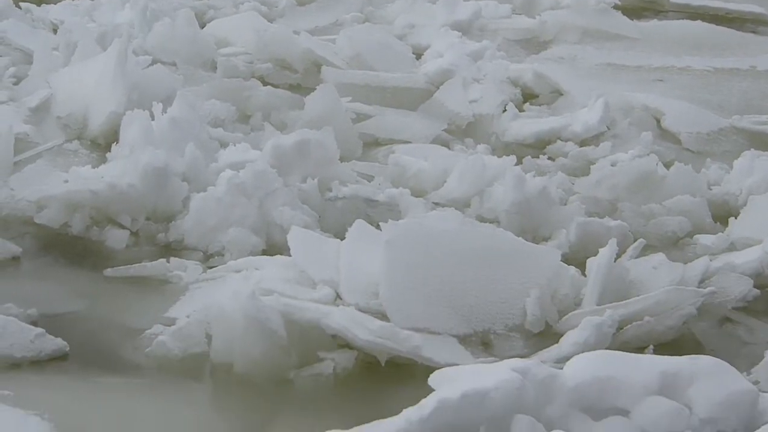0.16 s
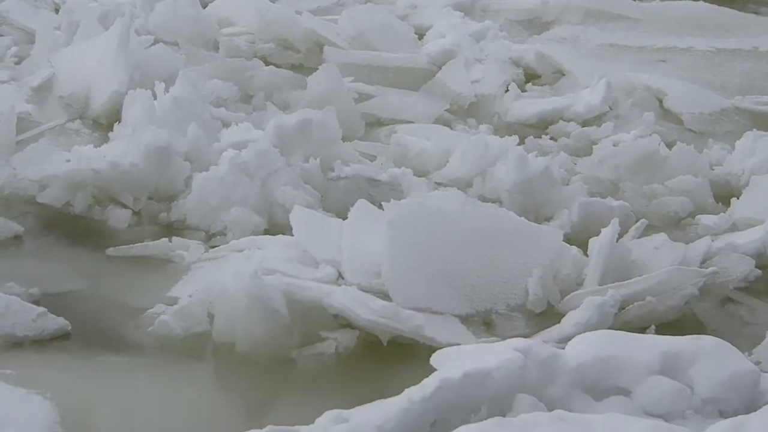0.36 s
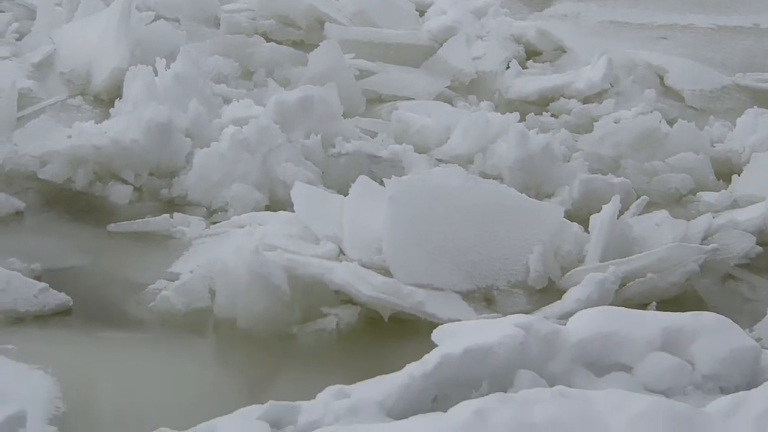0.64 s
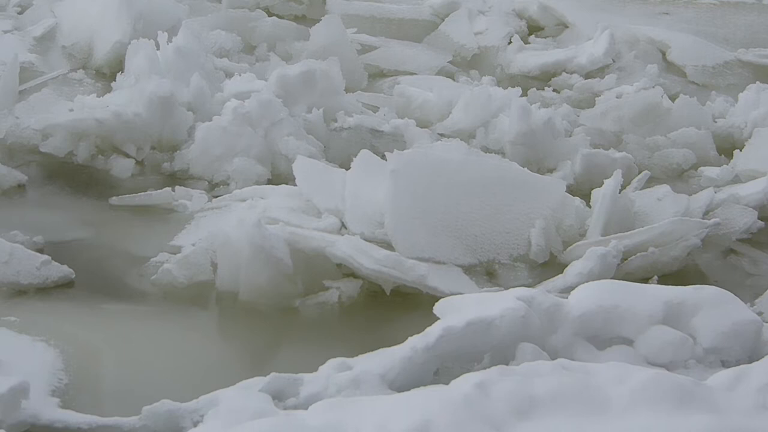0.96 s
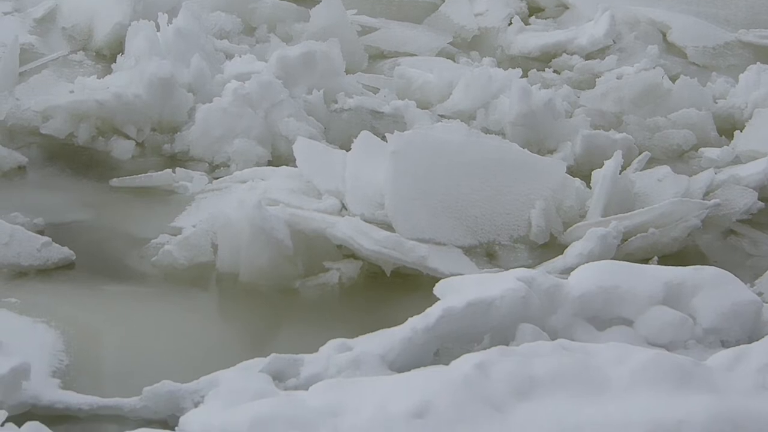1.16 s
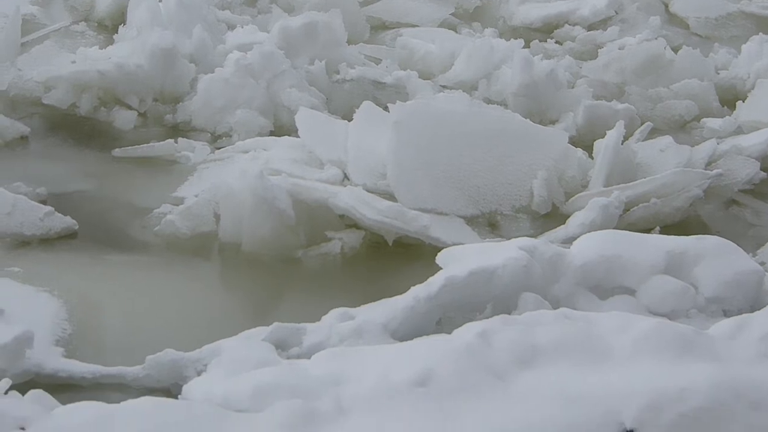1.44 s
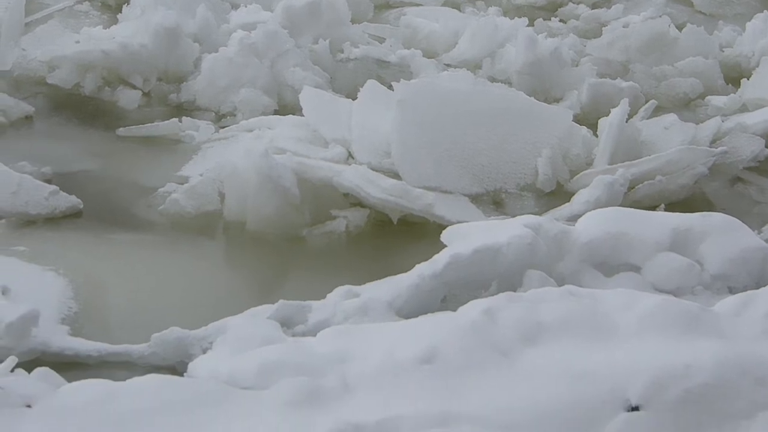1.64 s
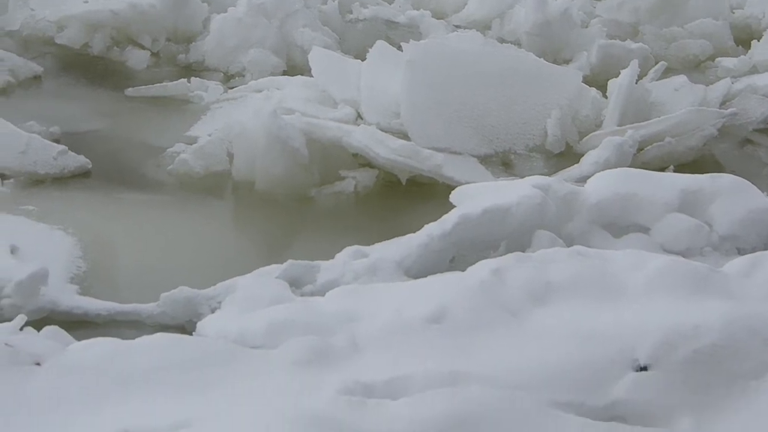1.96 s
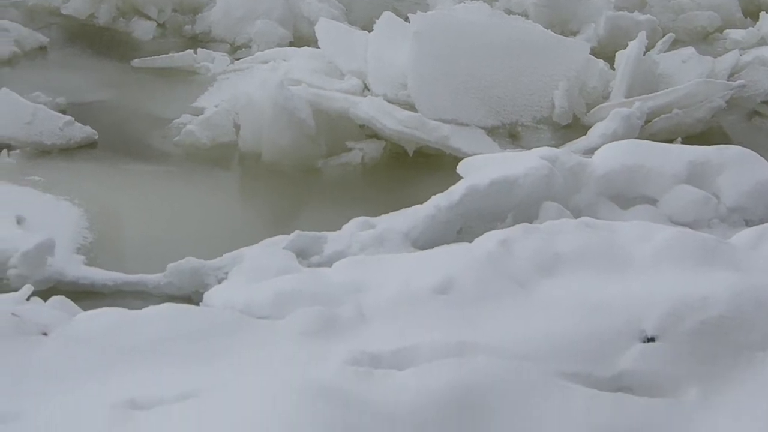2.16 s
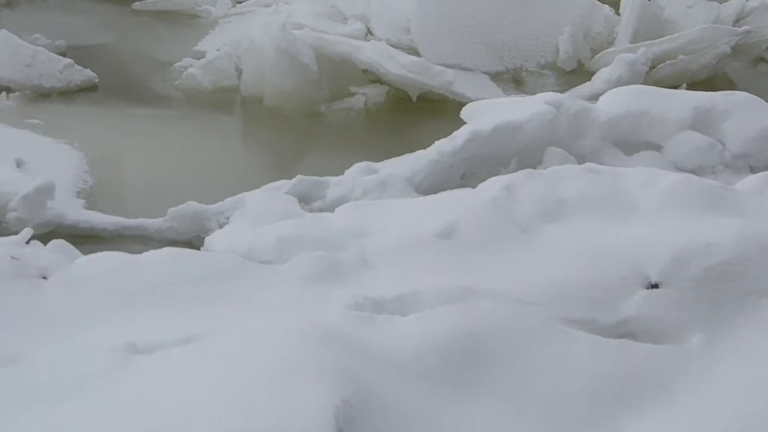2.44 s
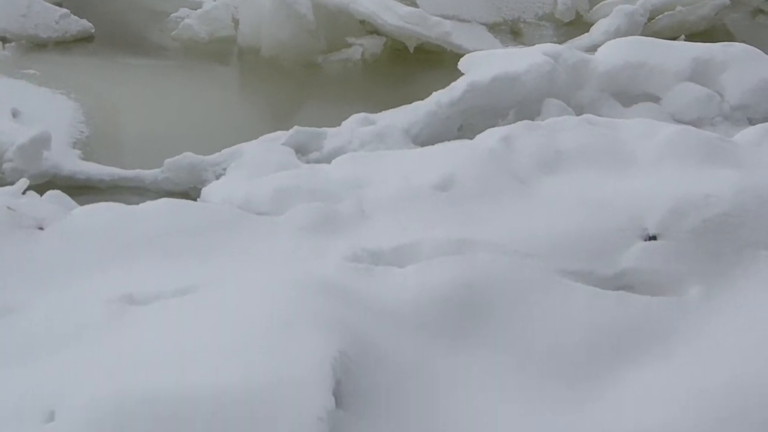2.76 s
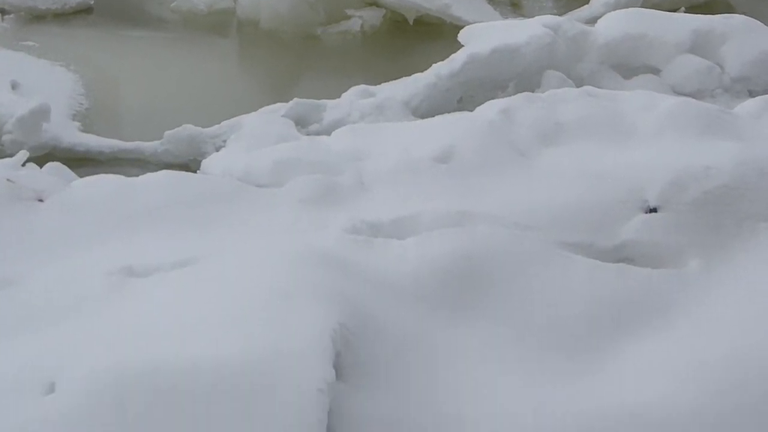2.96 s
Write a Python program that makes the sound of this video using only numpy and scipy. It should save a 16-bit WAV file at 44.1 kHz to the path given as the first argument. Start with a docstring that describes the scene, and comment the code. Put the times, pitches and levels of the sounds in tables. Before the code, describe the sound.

Gusty wind rumbles and flutters on a microphone over a very faint slush hiss

```python
"""Gusty wind on an icy riverbank

Gusty wind buffets a camera's microphone on the bank of an ice-choked river.
Eddies push on one port and pull on the other: filtered noise makes a low, lumpy rumble,
with a brighter flutter and crackle. Single big eddies add thuds, slaps and spits.
Behind the wind, drifting slush hisses faintly (noise and tiny grains),
and the ice ticks now and then (short noise crunches with a brief ring)."""
import sys
import numpy as np
from scipy import signal
from scipy.fft import rfft, irfft
from scipy.io import wavfile
from scipy.ndimage import uniform_filter1d

SR = 44100
rng = np.random.default_rng(int(sys.argv[2]) if len(sys.argv) > 2 else 0)


def transcribe(signal):
    """Save signal, clipped to [-1, 1], as a 16-bit WAV file at the path in sys.argv[1]."""
    frames = np.atleast_2d(signal).T
    limited = np.clip(frames, -1, 1)
    pcm = np.round(limited * 32767).astype(np.int16)
    wavfile.write(sys.argv[1], SR, pcm)


N = 137151  # length in samples
T, HZ = np.arange(N) / SR, np.fft.rfftfreq(N, 1 / SR)  # time of each sample, pitch of each frequency bin

# Slush hiss, tone colour: (frequency [Hz], relative level [dB])
SLUSH_SPECTRUM = [(20, 2), (60, 8.5), (300, 5.5), (1000, 6.5), (2500, -3.5), (3400, -5), (4040, 0),
                  (4350, -2), (4870, 3), (5700, 0.5), (7400, 1), (10700, -10.5), (15000, -29.5)]
# Stereo width of the slush: (frequency [Hz], side against centre [dB])
SLUSH_WIDTH = [(50, -68), (1000, -25), (3300, -8), (5000, -7.5), (7000, -7), (9000, -4), (14000, -2)]
# Slush loudness, before its flicker: (time [s], level [dB])
SLUSH_LEVEL = [(0, -63), (.2, -63), (.4, -60.5), (.55, -63), (1.0, -63.5), (1.35, -64.5), (1.62, -61.5),
               (1.8, -63.5), (2.3, -63.5), (2.9, -60), (3.11, -64.5)]
GRAINS_PER_S, GRAIN_SPREAD_DB = 1300, 2.5
GRAINS_DB = -10  # grains against the smooth hiss, before colouring
SLUSH_FLICKER_DB, SLUSH_FLICKER_HZ = 1, 19

# Ice ticks: (time [s], level before the top is softened [dB], ring frequency [Hz], decay [s],
# ring against crack [dB], upper edge [Hz])
TICKS = [(2.392, -50, 5100, 0.0048, -2.5, 7000), (2.684, -55, 2890, .005, -8, 3300),
         (3.046, -49.5, 7200, .0035, -18, 14500)]
# Tone colour of the crack: (frequency [Hz], relative level [dB])
CRACK_SPECTRUM = [(300, -5), (2000, 11), (3600, -3), (4400, 0), (8000, -3.5), (15000, -13)]
TICK_RING_WIDTH_HZ = 320  # from the middle of the ring to half strength

# Wind gusts, before the trims below: (time [s], rumble level [dB], flutter level [dB])
GUSTS = [(0.0, -26.5, -50), (0.035, -23.5, -47.5), (0.1, -28.5, -48), (0.135, -33, -62),
         (0.175, -23.5, -51), (0.22, -29.5, -54.5), (0.3, -29.5, -55.5), (0.39, -27, -53.5),
         (0.48, -24, -52.5), (0.54, -29, -52), (0.6, -30, -48), (0.68, -24, -51.5), (0.74, -28, -51),
         (0.815, -26.5, -45), (0.885, -27.5, -52), (0.93, -23.5, -45), (0.985, -22.5, -44.5),
         (1.035, -27, -49.5), (1.072, -25, -46.5), (1.12, -30, -56.5), (1.165, -29.5, -63),
         (1.195, -26.5, -53), (1.22, -33, -58), (1.265, -24.5, -40.5), (1.285, -29.5, -50),
         (1.305, -27, -54), (1.335, -25, -48), (1.37, -30.5, -48.5), (1.4, -30, -53.5),
         (1.541, -42.5, -64.5), (1.596, -29.5, -56.5), (1.65, -34, -53.5), (1.69, -23, -59),
         (1.75, -27.5, -46), (1.805, -24.5, -42), (1.835, -28.5, -47), (1.875, -28.5, -50),
         (1.92, -24.5, -51), (1.97, -28, -50), (2.015, -25.5, -46), (2.11, -26, -49.5), (2.16, -27.5, -49),
         (2.24, -26, -49), (2.29, -34.5, -55), (2.361, -24, -46.5), (2.41, -27, -49.5),
         (2.485, -33.5, -57.5), (2.564, -23, -46.5), (2.64, -29, -50), (2.71, -31.5, -53),
         (2.76, -40.5, -63.5), (2.8, -33.5, -59.5), (2.84, -34, -58), (2.9, -27, -53), (2.952, -23, -46.5),
         (3.02, -27, -51), (3.11, -28, -51)]
# Strongest single eddies, before the trims below: (time of the middle [s], thud peak [dB],
# slap peak [dB], spit peak [dB], break-up time [s])
BUFFETS = [(0.039, -12, -19, -46, .003), (0.108, -20, -25, -46, .002), (0.475, -17, -23, -47, .002),
           (0.504, -13, -14, -41, .004), (0.59, -17, -24, -42, .004), (0.607, -18, -22, -39, .002),
           (0.638, -18, -25, -50, .002), (0.684, -23, -29, -39, .003), (0.772, -19, -30, -43, .003),
           (0.858, -21, -22, -43, .002), (0.988, -11, -19, -39, .004), (1.008, -15, -22, -34, .002),
           (1.02, -16, -21, -45, .002), (1.26, -21, -21, -37, .005), (1.273, -16, -22, -49, .002),
           (1.331, -15, -32, -51, .002), (1.372, -25, -20, -43, .005), (1.679, -18, -23, -45, .002),
           (1.718, -14, -32, -58, .002), (1.799, -17, -31, -38, .003), (1.811, -18, -16, -31, .003),
           (1.853, -11, -20, -41, .003), (1.906, -19, -24, -50, .002), (1.981, -26, -30, -33, .003),
           (2.031, -14, -27, -50, .002), (2.077, -19, -32, -39, .003), (2.191, -18, -24, -39, .002),
           (2.241, -16, -22, -37, .003), (2.371, -17, -24, -45, .002), (2.573, -16, -23, -46, .004),
           (2.624, -22, -22, -42, .002), (2.886, -13, -24, -56, .002), (2.949, -20, -21, -39, .003),
           (2.983, -23, -20, -47, .003), (3.047, -17, -21, -39, .002)]
# Tone colours of the wind and its eddies, each: (frequency [Hz], relative level [dB])
RUMBLE_SPECTRUM = [(20, -50), (45, -44), (75, -18.5), (120, -4.5), (185, 0.5), (300, 0), (450, -5),
                   (700, -13), (1100, -30), (2000, -76), (4000, -100)]
FLUTTER_SPECTRUM = [(100, -43), (250, -17), (450, 1), (700, -4.5), (1000, -8), (1500, -17.5), (2000, -27),
                    (2700, -35.5), (3500, -49), (7000, -88)]
THUD_SPECTRUM = [(20, -31), (50, -32), (120, -5.5), (230, 9), (420, 0.5), (750, -46), (1600, -35),
                 (2700, -67), (4000, -87), (8000, -110)]
SLAP_SPECTRUM = [(100, -30), (250, -7), (450, 0), (600, -2), (800, -9), (1100, -18), (1500, -30),
                 (2500, -56), (5000, -95)]
SPIT_SPECTRUM = [(300, -30), (900, -3), (1400, 0), (1900, -4), (2600, -14), (3500, -29), (7000, -72),
                 (14000, -100)]
# Share of the wind both ports feel alike: (frequency [Hz], level against the push-pull part [dB])
COMMON_SHARE = [(30, -4.5), (70, -12), (150, -16), (300, -21), (600, -18.5), (1200, -11.5), (2200, -9.5),
                (4000, -5)]
RUMBLE_TRIM_DB, FLUTTER_TRIM_DB = -0.5, 9
THUD_TRIM_DB, SLAP_TRIM_DB, SPIT_TRIM_DB = -0.5, 0.5, 2
RUMBLE_LUMP_DB, FLUTTER_LUMP_DB, LUMP_HZ = 4.2, 6, 55
LUMP_SHARED = 0.8  # how far the flutter's lumps follow the rumble's (0 to 1)
CRACKLE_PER_S, CRACKLE_DB, CRACKLE_SPREAD_DB, CRACKLE_S = 85, -8.5, 6, 0.0018
WIND_TILT_DB = 0.1626  # the right port is raised and the left lowered by this much

OFFSET, EDGE_HZ = -0.0035, 15600  # the recorder's constant offset and upper band edge


def amp(db):
    """Turns decibels into a gain."""
    return 10 ** (np.asarray(db) / 20)


def unit(x):
    """Scales a sound to an average strength (rms) of 1."""
    return x / np.sqrt(np.mean(x ** 2) + 1e-20)


def colour(x, points):
    """Filters a sound by a table of (frequency [Hz], level [dB])."""
    hz, db = np.transpose(points)
    bins = np.fft.rfftfreq(len(x), 1 / SR)
    gain = amp(np.interp(np.log(bins + 1), np.log(hz), db))
    return irfft(rfft(x) * gain, len(x))


def noise(points):
    """Makes noise of rms 1 with the given tone colour."""
    return unit(colour(rng.standard_normal(N), points))


def unsteadiness(rate_hz, slowest_hz=9):
    """Random ups and downs mostly between two rates, gently limited to stay within -2 and 2."""
    shape = HZ / np.hypot(HZ, slowest_hz) / np.sqrt(1 + (HZ / rate_hz) ** 4)
    wander = unit(irfft(rfft(rng.standard_normal(N)) * shape, N))
    return 2 * np.tanh(wander / 2)


def steady(x, size=1800):
    """Evens out the slow changes in level and keeps the quick lumps."""
    power = uniform_filter1d(uniform_filter1d(x ** 2, size), size)
    return x / np.sqrt(power + 1e-12)


def fizz():
    """Smooth far hiss plus nearer grains: random clicks of either sign and uneven size."""
    happens = rng.random(N) < GRAINS_PER_S / SR
    sign = rng.choice([-1, 1], N)
    size = amp(GRAIN_SPREAD_DB * np.minimum(rng.exponential(1, N), 5))
    grains = unit(happens * sign * size)
    return unit(colour(rng.standard_normal(N) + amp(GRAINS_DB) * grains, SLUSH_SPECTRUM))


def slush():
    """Countless tiny ice crystals rub in the current: a fine, slightly grainy hiss."""
    centre, side = fizz(), colour(fizz(), SLUSH_WIDTH)
    flicker_db = SLUSH_FLICKER_DB * unsteadiness(SLUSH_FLICKER_HZ)
    level_db = np.interp(T, *np.transpose(SLUSH_LEVEL)) + flicker_db
    return np.array([centre + side, centre - side]) * amp(level_db)


def ticks(side_db=-8):
    """Ice cracks: a short crunch of noise with a brief ring, both dying away together."""
    out = np.zeros((2, N))
    for start, db, ring_hz, decay_s, ring_db, top_hz in TICKS:
        # the ring is noise squeezed into a narrow band
        resonance = 1 / (1 + ((HZ - ring_hz) / TICK_RING_WIDTH_HZ) ** 2)
        ring = unit(irfft(rfft(rng.standard_normal(N)) * resonance, N))
        centre = noise(CRACK_SPECTRUM) + amp(ring_db) * ring
        side = amp(side_db) * noise(CRACK_SPECTRUM)
        fade = (T >= start) * np.exp(-abs(T - start) / decay_s)
        crunch = np.array([centre + side, centre - side]) * amp(db) * fade
        soften_top = 1 / np.sqrt(1 + (HZ / top_hz) ** 6)
        out += irfft(rfft(crunch) * soften_top, N)
    return out


def crackle():
    """Small eddies burst at random, many a second: the loudness of their short spits, at rms 1."""
    happens = rng.random(N) < CRACKLE_PER_S / SR
    sizes = happens * amp(CRACKLE_SPREAD_DB * rng.uniform(-1.16, 1, N))
    puff_t = np.arange(-3 * CRACKLE_S, 3 * CRACKLE_S, 1 / SR)
    puff = np.exp(-(puff_t / CRACKLE_S) ** 2)
    return unit(signal.oaconvolve(sizes, puff, "same"))


def burst(push, spectrum):
    """Filters a push of air to a peak of 1, as a complex wave whose phase can be turned."""
    pulse = signal.hilbert(colour(push, spectrum))
    return pulse / abs(pulse).max()


def buffets(size=4096):
    """Each big eddy is a thud of a cycle or two, with a ragged slap and a bright spit as it breaks up."""
    t = (np.arange(size) - size // 2) / SR
    out = np.zeros(N + size)
    thud = burst(1. * (t == 0), THUD_SPECTRUM)
    for middle, thud_db, slap_db, spit_db, breakup_s in BUFFETS:
        slap, spit = rng.standard_normal((2, size)) * np.exp(-(t / breakup_s) ** 2)
        eddy = amp(thud_db + THUD_TRIM_DB) * thud
        eddy = eddy + amp(slap_db + SLAP_TRIM_DB) * burst(slap, SLAP_SPECTRUM)
        eddy = eddy + amp(spit_db + SPIT_TRIM_DB) * burst(spit, SPIT_SPECTRUM)
        # a random phase gives each eddy its own wave shape
        turn = np.exp(2j * np.pi * rng.random())
        out[round(middle * SR):][:size] += (eddy * turn).real
    return out[size // 2:][:N]


def pressure(lumps, quick_lumps, spits):
    """One random draw of the turbulent pressure: rumble, flutter with crackle, and big eddies."""
    s, rumble_db, flutter_db = np.transpose(GUSTS)
    rumble = steady(colour(rng.standard_normal(N) * amp(RUMBLE_LUMP_DB * lumps), RUMBLE_SPECTRUM))
    flutter = steady(colour(rng.standard_normal(N) * amp(FLUTTER_LUMP_DB * quick_lumps), FLUTTER_SPECTRUM))
    flutter = amp(FLUTTER_TRIM_DB) * flutter + amp(CRACKLE_DB) * spits * noise(SPIT_SPECTRUM)
    rumble = rumble * amp(RUMBLE_TRIM_DB + np.interp(T, s, rumble_db))
    flutter = flutter * amp(np.interp(T, s, flutter_db))
    return rumble + flutter + buffets()


def wind():
    """Rumble, flutter and crackle follow the gusts; the ports move mostly in opposition."""
    lumps, spits = unsteadiness(LUMP_HZ), crackle()
    own_lumps = unsteadiness(2 * LUMP_HZ)
    quick_lumps = LUMP_SHARED * lumps + np.sqrt(1 - LUMP_SHARED ** 2) * own_lumps
    opposed = pressure(lumps, quick_lumps, spits)
    common = colour(pressure(lumps, quick_lumps, spits), COMMON_SHARE)
    left = (common + opposed) * amp(-WIND_TILT_DB)
    right = (common - opposed) * amp(WIND_TILT_DB)
    return np.array([left, right])


def scene():
    """The river behind, the wind in front."""
    return slush() + ticks() + wind()


def record(dry):
    """Adds the recorder's constant offset and removes what lies above its band edge."""
    lowpass = signal.firwin(511, EDGE_HZ, window=("kaiser", 9), fs=SR)
    return signal.oaconvolve(dry + OFFSET, lowpass[None], "same")


dry = scene()
out = record(dry)
transcribe(out)
```